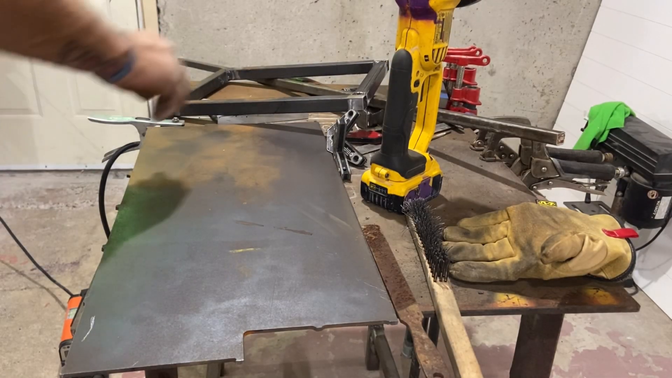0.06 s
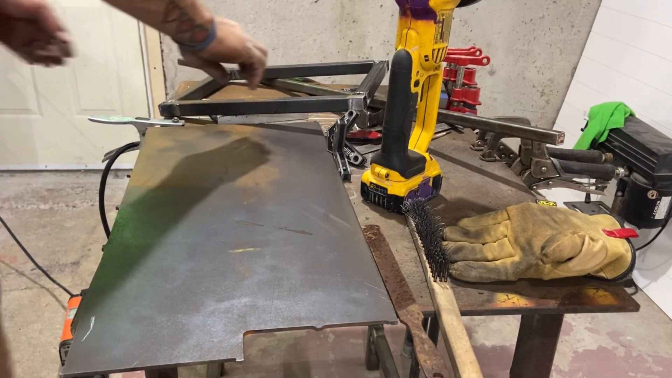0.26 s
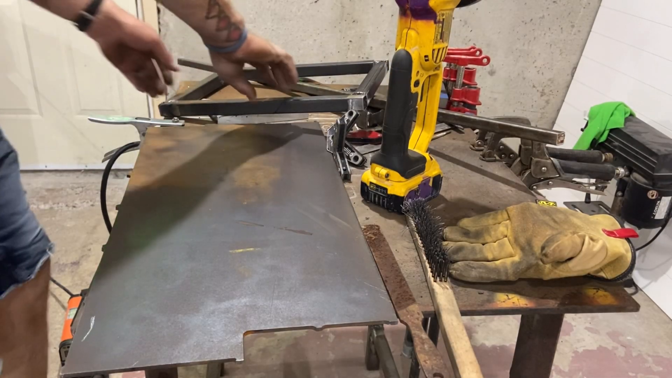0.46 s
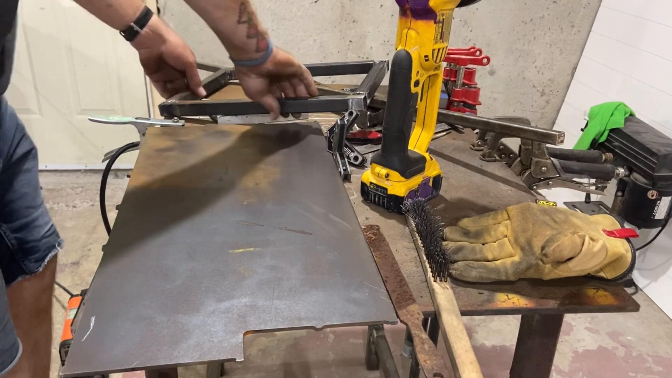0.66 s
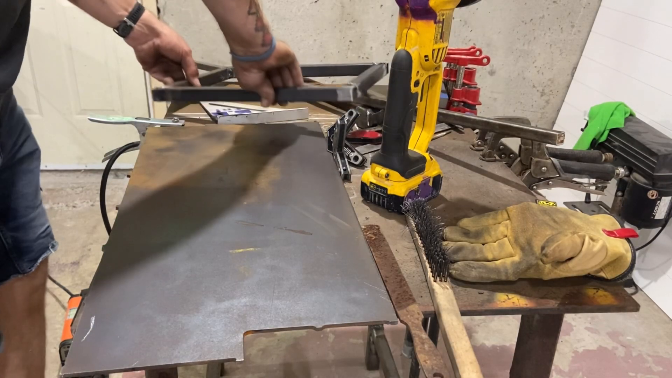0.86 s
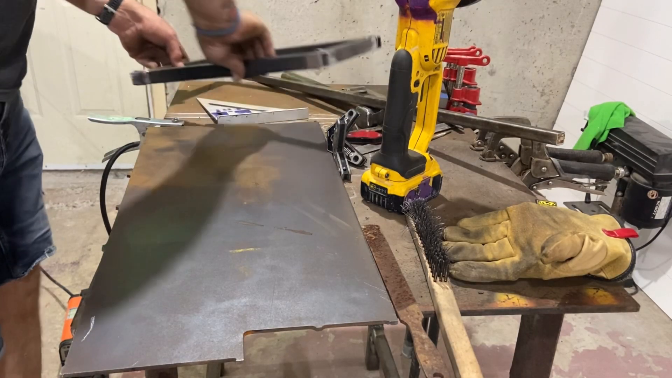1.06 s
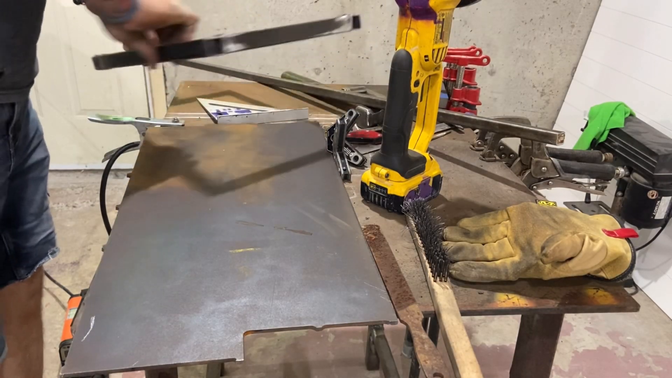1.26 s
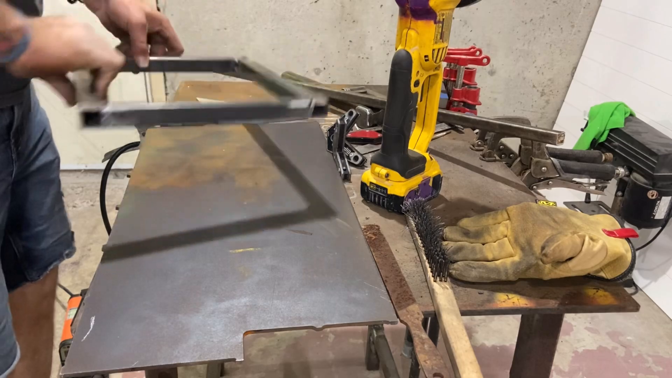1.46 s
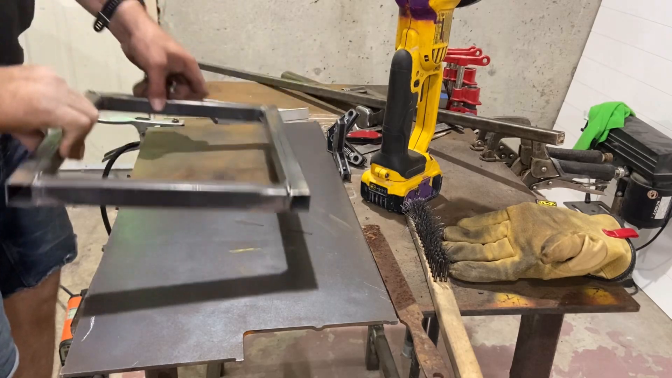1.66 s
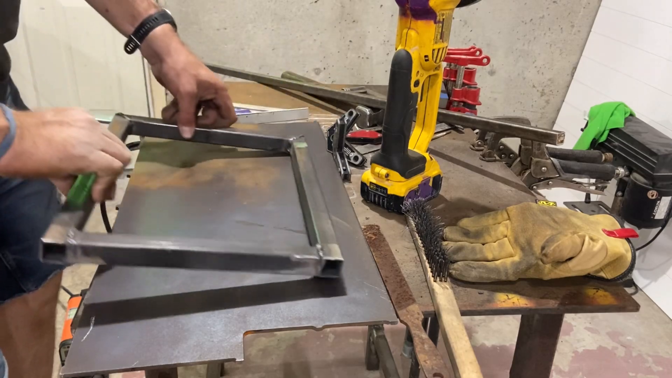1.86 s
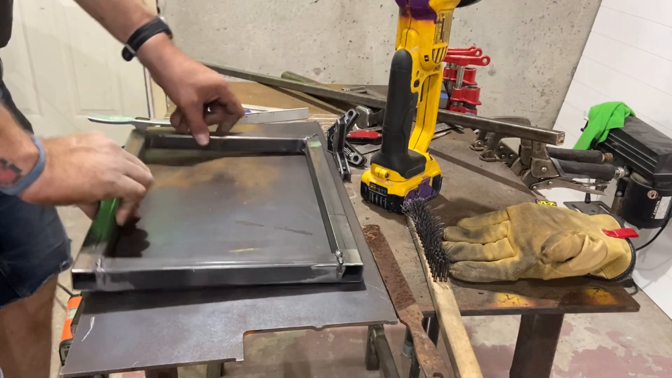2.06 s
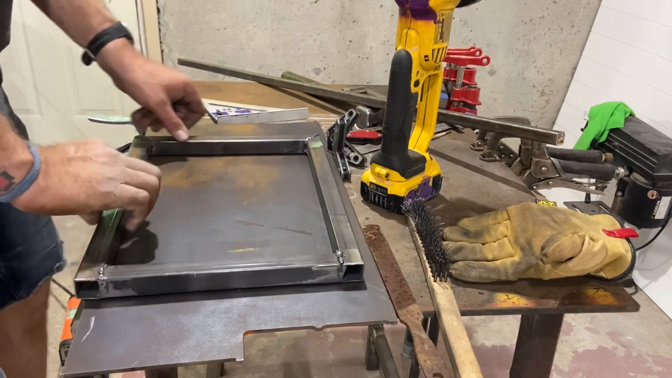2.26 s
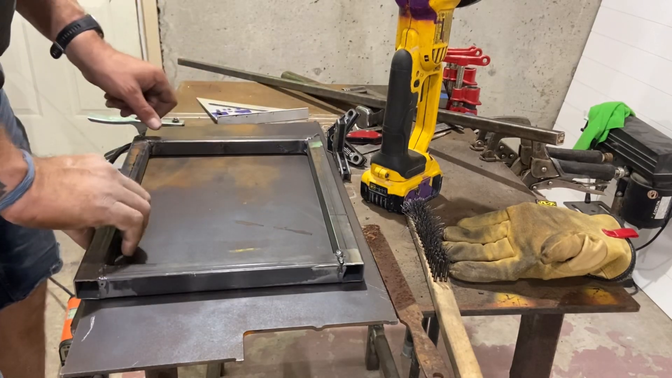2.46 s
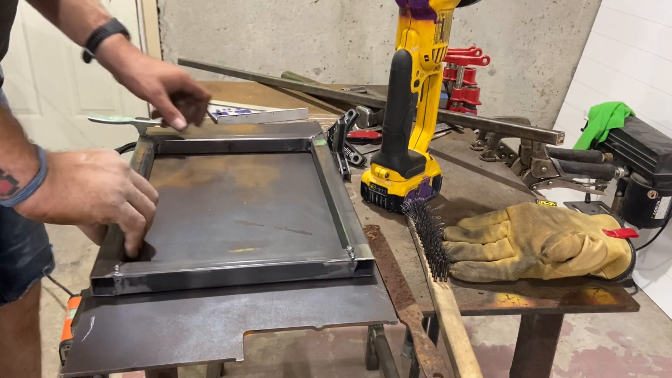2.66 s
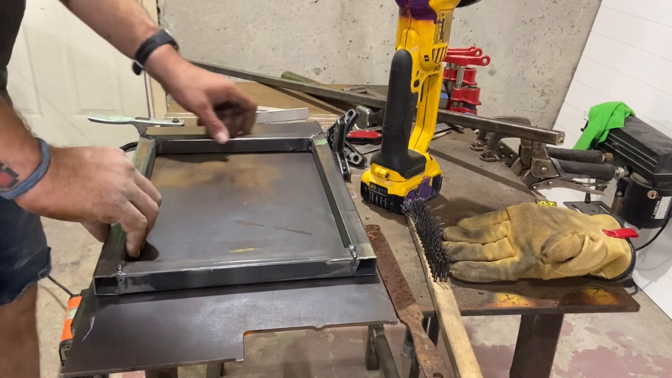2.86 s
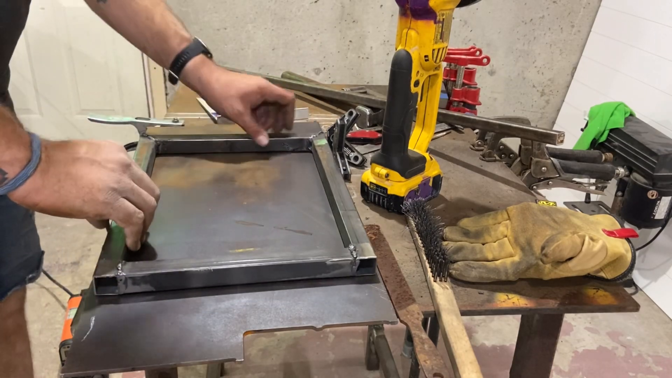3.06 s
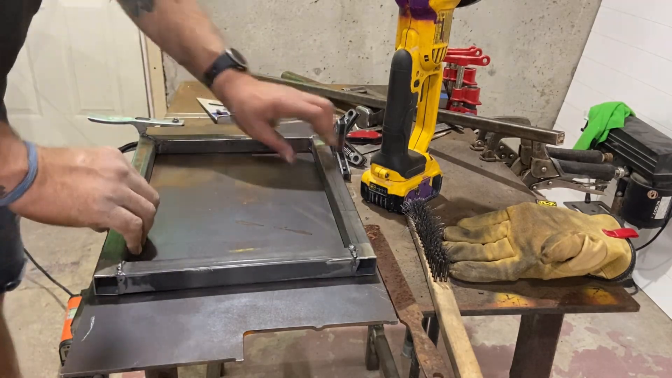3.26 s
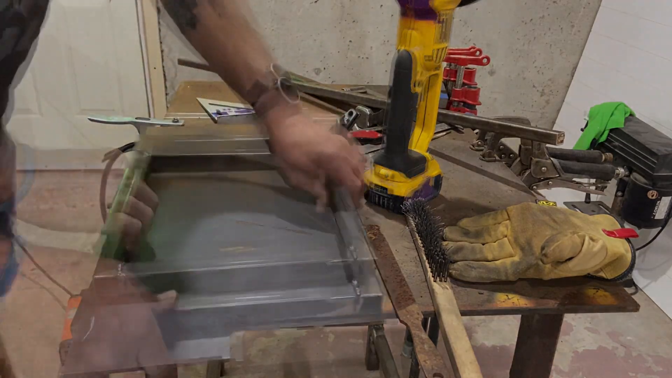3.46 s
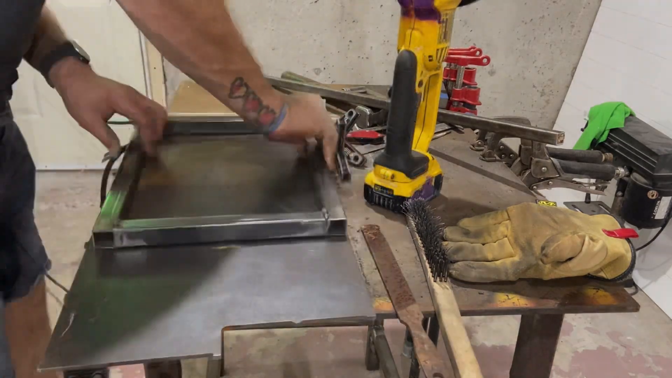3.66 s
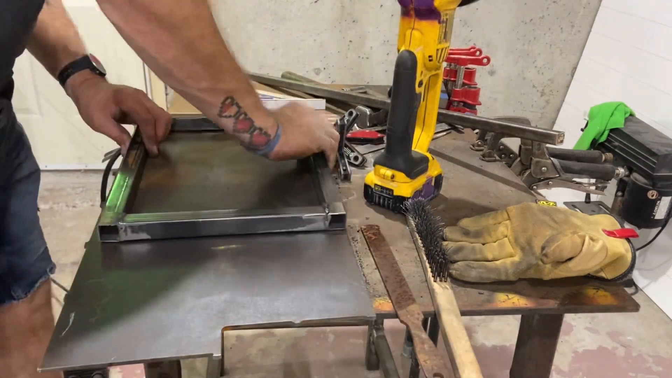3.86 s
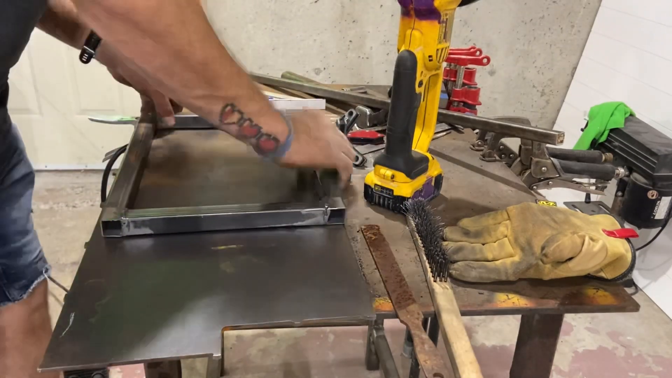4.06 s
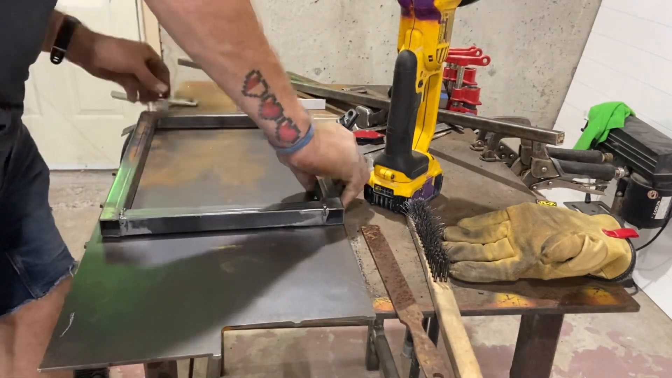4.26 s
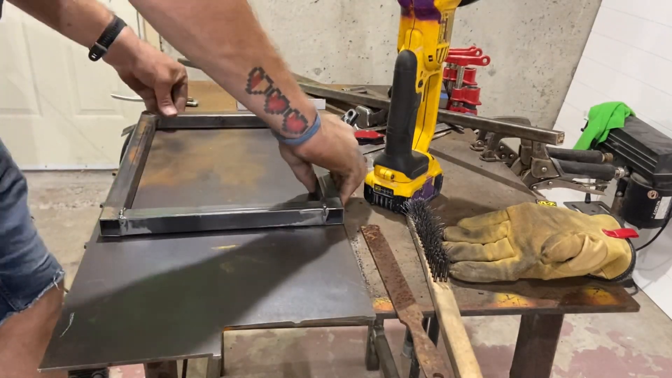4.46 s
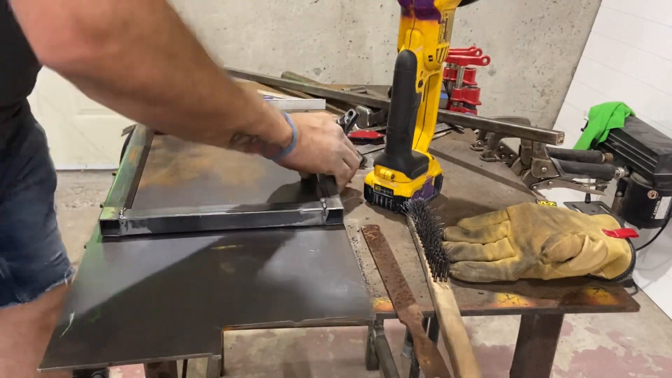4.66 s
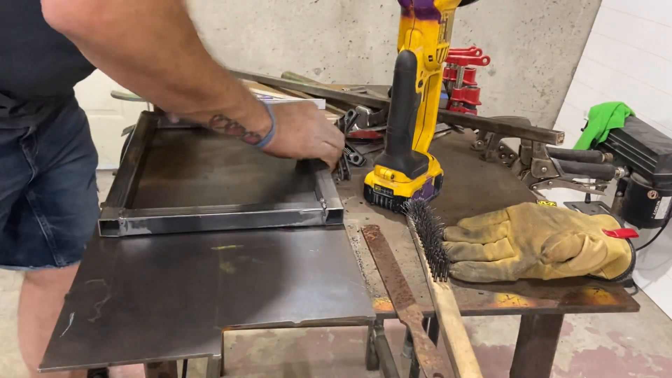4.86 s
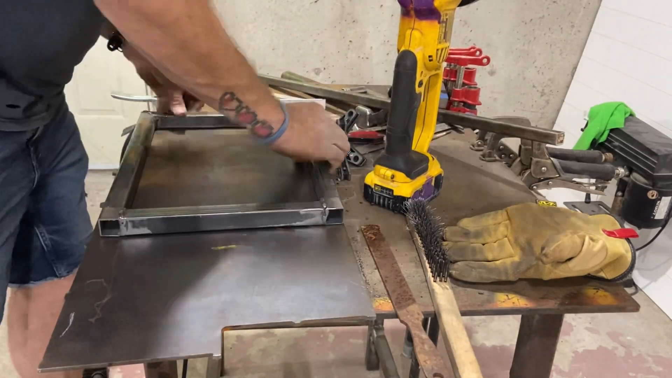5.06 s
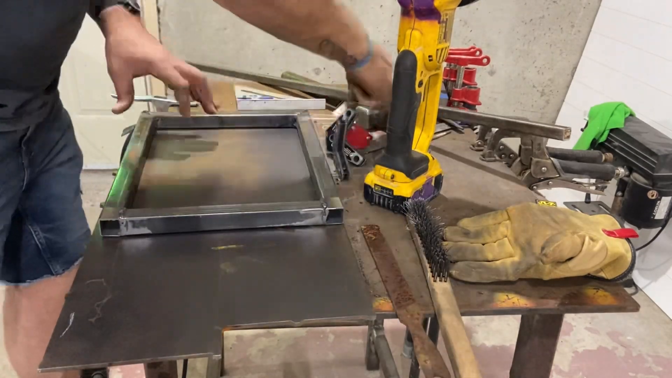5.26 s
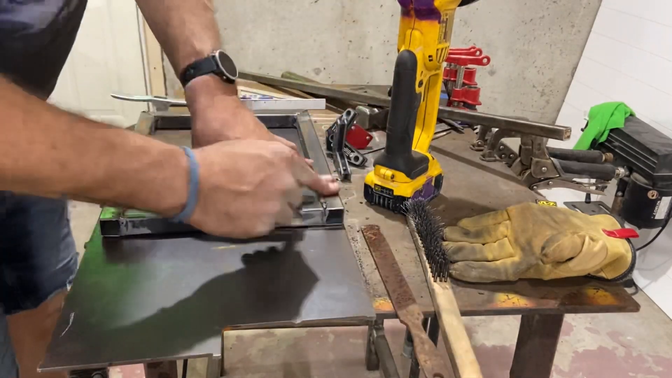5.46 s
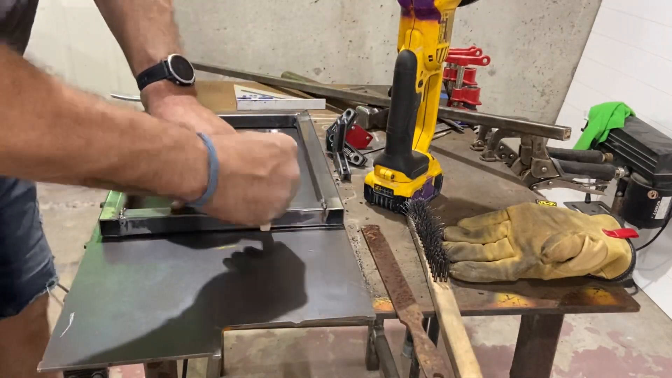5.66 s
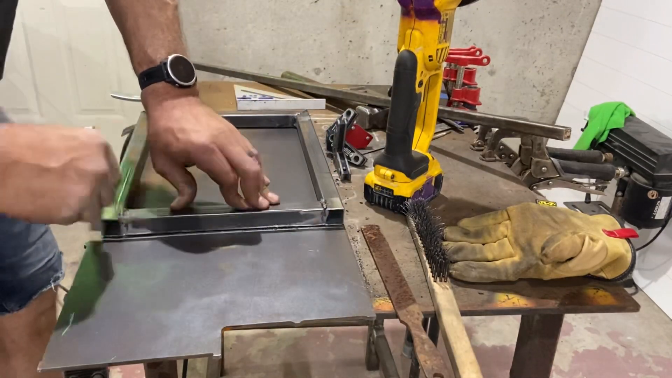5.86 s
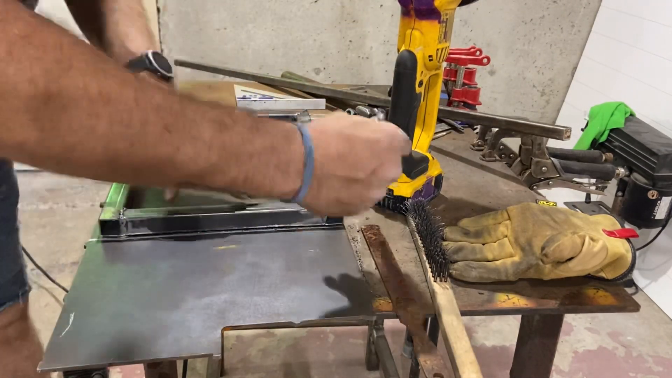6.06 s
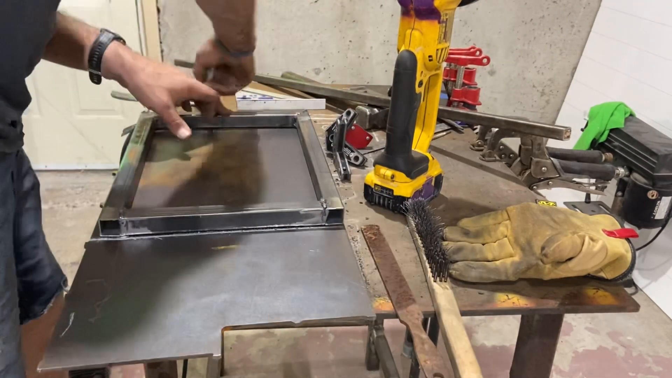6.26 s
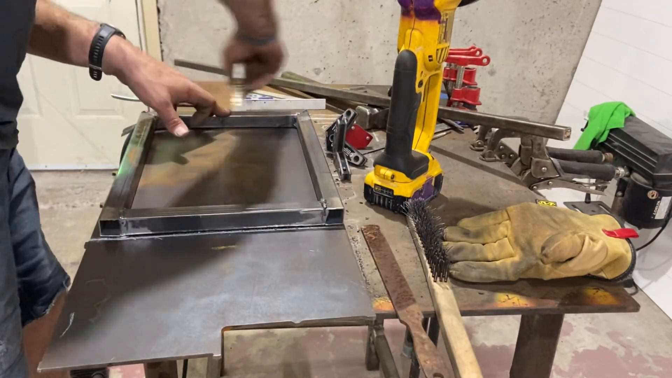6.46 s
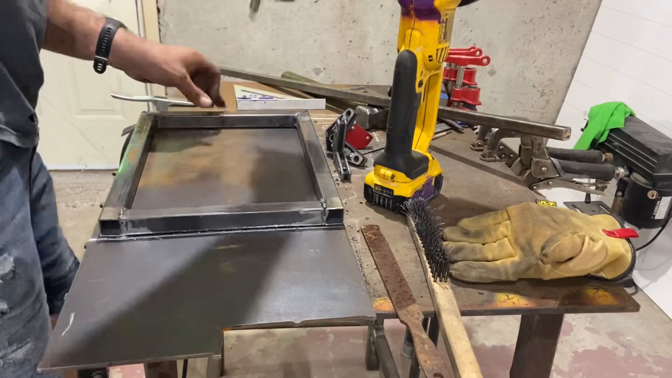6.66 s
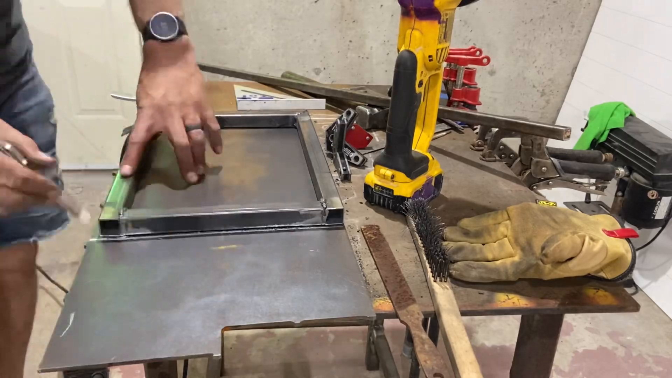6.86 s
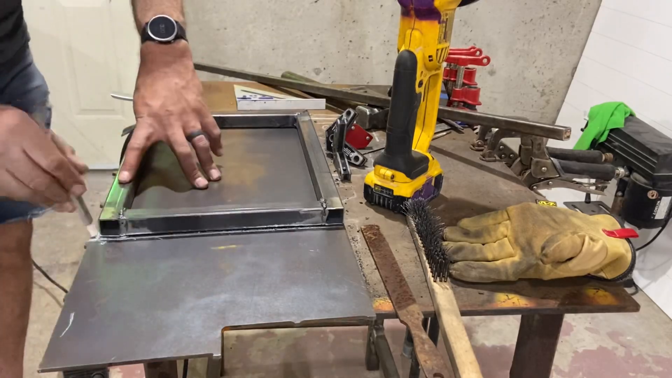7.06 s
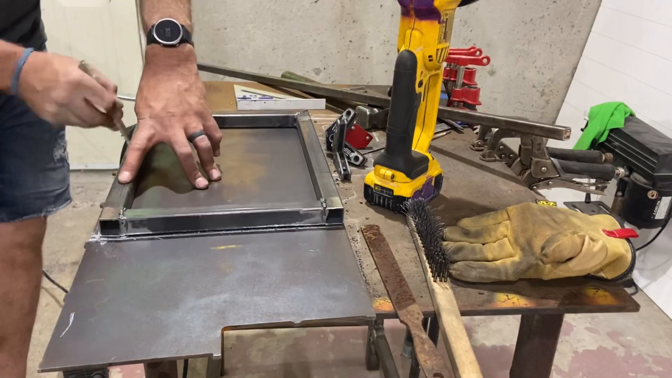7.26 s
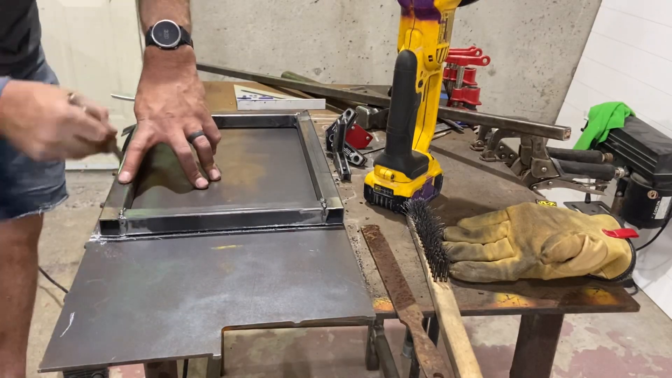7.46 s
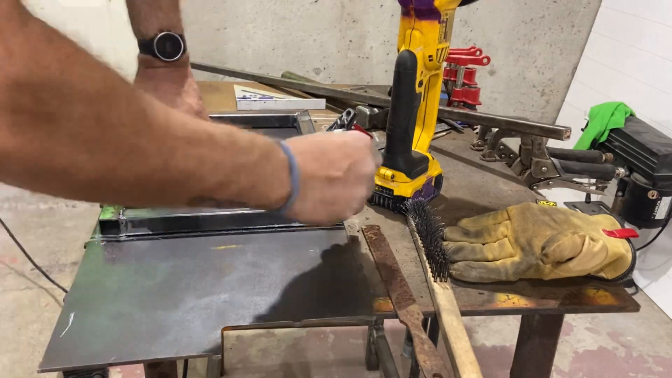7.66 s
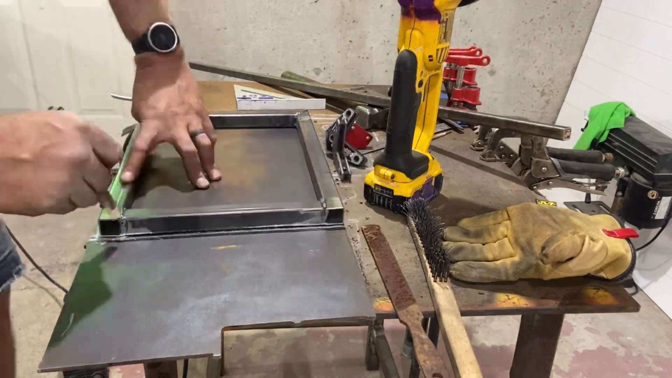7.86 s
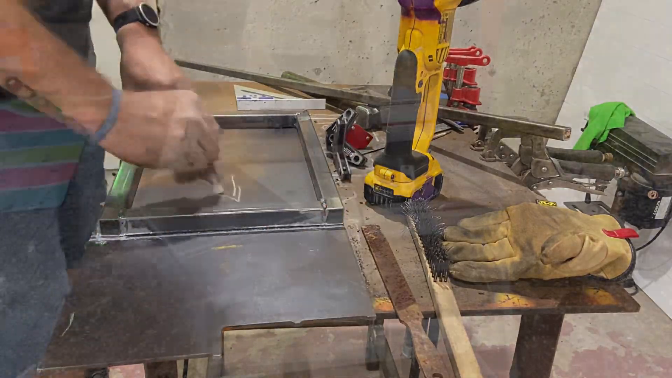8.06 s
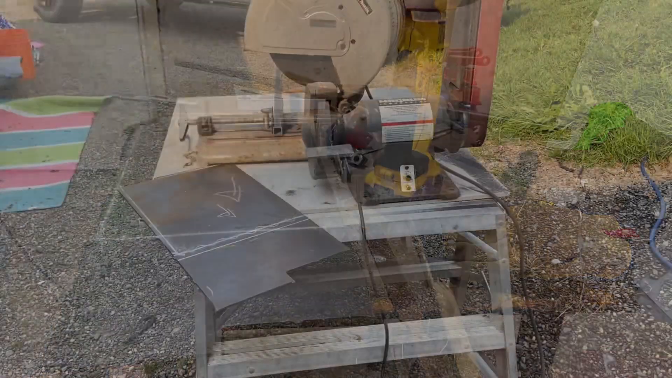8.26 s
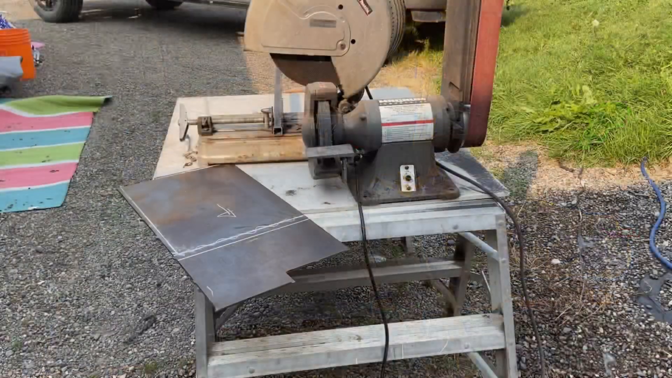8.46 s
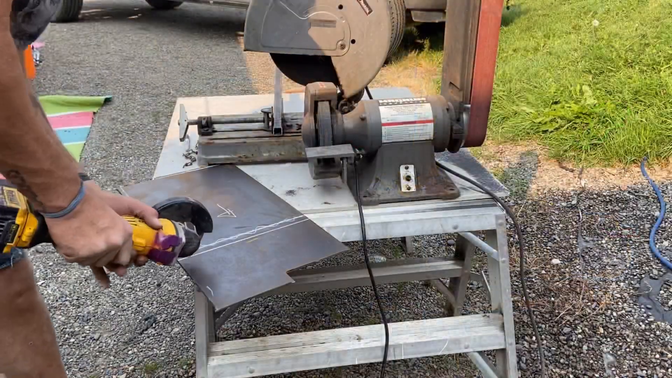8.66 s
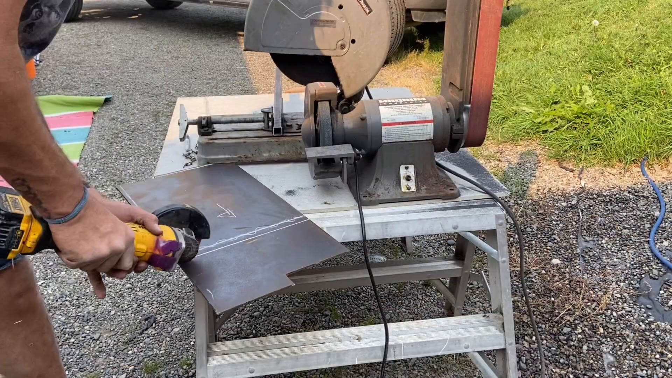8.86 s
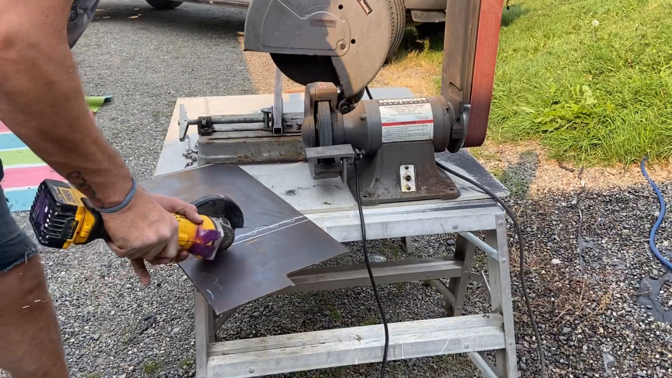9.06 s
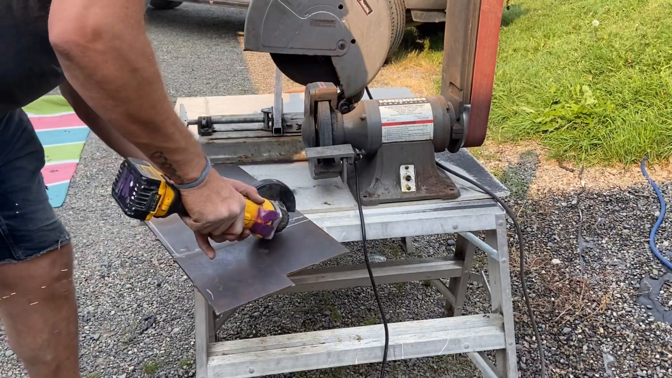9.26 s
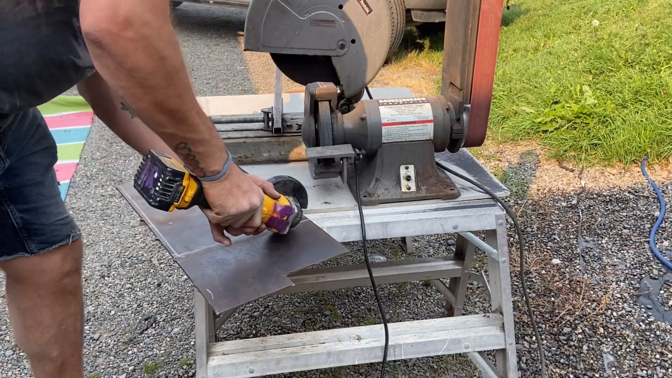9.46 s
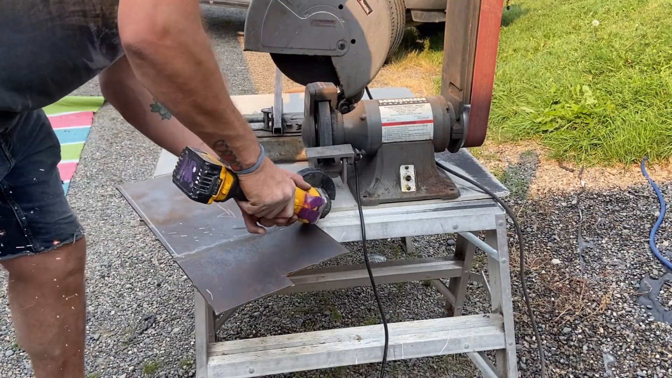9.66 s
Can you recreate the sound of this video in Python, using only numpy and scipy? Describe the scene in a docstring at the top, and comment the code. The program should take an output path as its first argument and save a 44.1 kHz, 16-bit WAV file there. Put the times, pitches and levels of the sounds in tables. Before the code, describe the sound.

In a home workshop with a soft fan hum, a welded steel frame scrapes, clinks against loose bars and lands on sheet steel in two loud ringing blows, then slides. Time speeds up: the hum turns to thin hissing whine with quick chirping marker strokes. Finally, outdoors, a sped-up angle grinder clicks on and cuts in three shrill pushes. Close microphone, lively room, then dry open air.

```python
"""In a workshop where a fan hums, a welded steel frame slides, clinks on loose bars and lands in two blows:
excited modes ring and die. Then time runs about ten times fast: the hum becomes whining lines in a thin
hiss, and friction noise in short swells makes chirps of marker strokes. Still sped up, an angle grinder
clicks and spins up outdoors and cuts the sheet in three pushes, as tones locked to its disc, noise that
pulses with each turn, and screeching resonances."""
import sys
import numpy as np
from scipy import signal
from scipy.fft import rfft, irfft
from scipy.io import wavfile

SR = 44100
rng = np.random.default_rng(int(sys.argv[2]) if len(sys.argv) > 2 else 0)


def log_audio(samples):
    """Write samples as a 16-bit WAV file to the path given in sys.argv[1]."""
    # one column per channel
    frames = np.atleast_2d(samples).T
    # limit to full scale, then quantise
    limited = np.clip(frames, -1, 1)
    pcm = np.round(limited * 32767).astype(np.int16)
    wavfile.write(sys.argv[1], SR, pcm)


N = 427769
T = np.arange(N) / SR
HZ = np.fft.rfftfreq(N, 1 / SR)
SPEED_UP_S, SLOW_END_S, INDOOR_END_S = 3.267, 3.774, 8.528  # the two fan sounds overlap at first


def amp(db):
    """Level law: decibels to amplitude gain."""
    return 10 ** (np.asarray(db) / 20)


def unit(x):
    """Normalisation to rms 1."""
    return x / np.sqrt(np.mean(x ** 2) + 1e-20)


def read(points, hz):
    """Interpolation of a spectrum along a logarithmic frequency axis."""
    f, value = np.transpose(points)
    return np.interp(np.log(hz + 1), np.log(f + 1), value)


def curve(rows):
    """Linear interpolation of a (time, value) table at every sample."""
    rows = np.array(rows)
    return np.interp(T, rows[:, 0], rows[:, 1])


def gate(start, end, fade=0.0034):
    """Trapezoidal window: one between two times, with short ramps inside."""
    return np.clip((T - start) / fade, 0, 1) * np.clip((end - T) / fade, 0, 1)


def swell(start, length, attack, release):
    """Envelope: linear rise from the start, hold until start + length, exponential decay."""
    rise = np.clip((T - start) / attack, 0, 1)
    return rise * np.exp(-np.maximum(T - start - length, 0) / release)


def add(mix, s, sound):
    """Superposition: mixes a sound in at a time."""
    part = mix[round(s * SR):][:len(sound)]
    part += sound[:len(part)]


def colour(x, db):
    """Linear filtering by a gain in dB at every frequency; rms 1."""
    return unit(irfft(rfft(x) * amp(db), N))


def noise(db):
    """Filtered Gaussian noise of rms 1."""
    return colour(rng.standard_normal(N), db)


def wander(hz):
    """Low-pass random modulation up to a rate; rms 1."""
    return unit(irfft(rfft(rng.standard_normal(N)) * np.exp(-(HZ / hz) ** 2), N))


def grit(per_s, spread_db):
    """Poisson-like friction: tiny contacts of uneven size at random times."""
    size = amp(spread_db * np.minimum(rng.exponential(1, N), 4))
    return size * rng.standard_normal(N) * (rng.random(N) < per_s / SR)


def bell(hz, width):
    """Lorentzian power response of one damped resonance."""
    return 1 / (1 + (2 * (HZ - hz) / width) ** 2)


def ripple(spacing_hz):
    """Modal crowding in a steel sheet, as a random ripple over frequency; rms 1."""
    knots = np.arange(0, SR / 2, spacing_hz)
    return unit(np.interp(HZ, knots, rng.standard_normal(SR)[:len(knots)]))


def flaring(drive, modes, flare_db, rate_hz):
    """Moving-contact excitation: high resonances of the steel flare up and fade separately; rms 1."""
    total = 0
    for hz, width, db in modes:
        flare = amp(db + flare_db * wander(rate_hz))
        total = total + flare * colour(drive, 20 * np.log10(bell(hz, width)))
    return unit(total)


def mode_ring(hz, t60, t):
    """Beating: a square tube rings in two close modes that start together and decay exponentially."""
    phase, split = rng.random(), 1 + 0.0024 * rng.uniform(0.5, 1)
    pair = np.sin(2 * np.pi * (hz * t + phase)) + .3 * np.sin(2 * np.pi * (hz * split * t + phase))
    return pair * np.exp(-np.log(1000) * t / t60)


def dying(spectrum, t60):
    """Frequency-dependent decay: one second of dense ringing from about rms 1, each band at its own speed."""
    hz, t, z = signal.stft(rng.standard_normal(SR), SR, nperseg=256)
    z = z * amp(read(spectrum, hz))[:, None]
    start = np.std(signal.istft(z, SR, nperseg=256)[1])
    decay = np.exp(-np.log(1000) * t / read(t60, hz)[:, None])
    return signal.istft(z * decay, SR, nperseg=256)[1][:SR] / start


def hum(lines, drift_hz, rate_hz, flutter):
    """Tonal machine noise: lines share one proportional drift (drift_hz at the last) and waver in level."""
    drift = np.cumsum(wander(rate_hz)) * drift_hz / lines[-1][0]
    waver = [1 + flutter * wander(rate_hz) for _ in range(3)]
    total = 0
    for k, (hz, db) in enumerate(lines):
        cycles = hz * (T + drift / SR) + rng.random()
        total = total + amp(db) * waver[k % len(waver)] * np.sin(2 * np.pi * cycles)
    return np.sqrt(2) * total


# spectrum of the fan's rushing air: (frequency [Hz], relative density [dB per Hz])
FAN_AIR_SPECTRUM = [(21, -55), (35, -15.5), (102, 0.5), (177, -3.5), (217, -9), (295, -4.5), (453, -9.5),
                    (663, -10.5), (922, -12.5), (1530, -17), (1920, -21), (2300, -20.5), (2610, -23),
                    (2810, -22.5), (15000, -43)]
# hum of the fan's motor: (frequency [Hz], level [dB])
FAN_HUM_LINES = [(166.9, -52.5), (290.7, -50), (360.7, -51), (516.8, -55), (656.8, -50.5)]
# brief dip of the fan sound after the second blow: (time [s], gain [dB])
FAN_DIP = [(2.12, 0), (2.16, -9), (2.2, -16), (2.28, -14), (2.36, -5), (2.46, 0)]


def fan():
    """Broadband flow noise and tonal motor hum at natural speed."""
    air = amp(-38) * noise(read(FAN_AIR_SPECTRUM, HZ))
    motor = hum(FAN_HUM_LINES, drift_hz=0.34, rate_hz=5.2, flutter=0.49)
    return (air + motor) * amp(curve(FAN_DIP)) * gate(-1, SLOW_END_S)


# shoves of the frame over steel: (start [s], rise and hold [s], grinding body [dB], gritty top [dB])
SHOVES = [(0.273, .035, -45.5, -46), (0.831, 0.068, -48, -44.5), (1.16, .04, -55, -47),
          (1.937, .04, -35, -44), (2.006, 0.027, -37, -35.5), (2.073, 0.024, -37, -31),
          (2.555, 0.13, -32, -43.5), (3.456, 0.316, -42.5, -48)]
# spectrum of the grinding body: (frequency [Hz], relative density [dB per Hz])
GRINDING_SPECTRUM = [(530, -28), (900, -13), (1400, -2.5), (1560, -8), (2200, -6.5), (3240, -19.5),
                     (4290, -25), (5300, -21), (9000, -33.5), (11700, -54), (19800, -120)]
# spectrum of the gritty top, also of the clinks' scratch: (frequency [Hz], relative density [dB per Hz])
GRITTY_SPECTRUM = [(2500, -7), (5000, -2.5), (7000, -2.5), (9000, -5), (12000, -8.5), (15500, -13)]


def slides():
    """Stick-slip friction: small catches of steel on steel excite the frame's modes; each shove judders."""
    ring_db = 10 * np.log10(0.079 + sum(bell(mode[0], 32) for mode in FRAME_MODES))
    catches = grit(per_s=12000, spread_db=-0.3) * amp(1.6 * wander(50))
    body = colour(catches, read(GRINDING_SPECTRUM, HZ) + ring_db)
    top = colour(catches, read(GRITTY_SPECTRUM, HZ) + ring_db)
    out = np.zeros(N)
    for s, length, body_db, top_db in SHOVES:
        shove = swell(s, length, attack=0.023, release=0.034)
        out += shove * (amp(body_db) * body + amp(top_db) * top)
    return out


# touches as the frame is lifted off loose bars: (time [s], ring gain [dB])
BAR_TOUCHES = [(.302, -61), (.812, -45), (.845, -40), (.866, -44), (1.133, -55), (1.176, -57), (1.2, -47.5)]
# modes of a loose bar: (frequency [Hz], t60 [s], relative amplitude [dB])
BAR_MODES = [(2080, 0.18, 0), (3200, 0.17, -10), (5000, 0.27, -7), (5530, 0.4, -4.5), (7140, 0.25, 1),
             (7400, .15, -5), (11500, 0.16, -4), (14500, .1, -11)]


def clinks():
    """Modal excitation: light touches scratch a loose steel bar and ring it."""
    out, t = np.zeros(N), np.arange(SR // 2) / SR
    scratch = noise(read(GRITTY_SPECTRUM, HZ) + 4.7 * ripple(250))
    for s, db in BAR_TOUCHES:
        ring = sum(amp(mode_db) * mode_ring(hz, t60, t) for hz, t60, mode_db in BAR_MODES)
        add(out, s, amp(db) * ring * (1 - np.exp(-t / .0005)))
        out += amp(db + 6.5) * swell(s, 0, attack=.001, release=0.013) * scratch
    return out


# blows: (time [s], ring gain [dB], sheet gain [dB], crack gain [dB], contact [0 edge, 1 corner])
LANDINGS = [(1.8666, -16.5, -14, -11, 0), (2.111, -14.5, -12.5, -12, 1)]
# modes of the frame on the sheet, which also colour the slides:
# (frequency [Hz], t60 [s], relative amplitude struck on edge [dB], same struck on corner [dB])
FRAME_MODES = [(619, 0.42, -6, -28), (778, 0.29, -1, -14), (1046, 0.32, -6, -14), (1261, 0.33, -10, -7),
               (1421, 0.36, -5, -8), (1620, 0.35, -5, -4), (1789, 0.32, -3, -8), (2085, 0.32, -4, -2),
               (2272, 0.36, 0, -13), (2420, 0.35, -4, -10), (2667, 0.31, -5, -16), (2906, 0.28, -4, -10),
               (3215, 0.31, -11, -7), (3476, 0.25, -17, -2), (3604, 0.28, -10, -9), (4094, 0.3, 1, -6),
               (4459, 0.28, -16, -5), (4802, 1.15, -24, -14), (5099, 0.31, -37, -10), (5323, 0.28, -22, -9),
               (5939, 0.33, -30, -8), (6160, 0.28, -26, -3), (6751, 0.26, -27, -5), (7337, 0.38, -21, -13),
               (7603, 0.42, -29, -10), (8433, 0.35, -39, -10), (8780, 0.35, -39, -9),
               (10072, 0.49, -36, -17), (10872, 0.4, -41, -20), (11907, 0.37, -43, -18)]
# dense ringing of the sheet under an edge: (frequency [Hz], relative density [dB per Hz])
EDGE_SPECTRUM = [(88, -45), (150, -23), (464, -14), (786, -3.5), (901, -20), (1030, -13), (1160, -7),
                 (1380, -8), (2340, -1), (4630, -7.5), (6080, -19.5), (9340, -23), (15800, -52)]
# dense ringing of the sheet under a corner: (frequency [Hz], relative density [dB per Hz])
CORNER_SPECTRUM = [(88, -51), (150, -18), (492, -12), (564, -14), (833, -16), (1380, -5.5), (1710, -3.5),
                   (2120, -1.5), (3520, -6), (3810, -5.5), (6840, -7.5), (12000, -26.5), (15800, -40)]
# decay of the sheet: (frequency [Hz], t60 [s])
SHEET_DECAY = [(200, 0.16), (1000, 0.53), (2500, 0.23), (6000, 0.19), (14000, 0.47)]
# decay of the room: (frequency [Hz], t60 [s])
ROOM_DECAY = [(200, 0.43), (1500, 1), (5000, 0.98), (14000, 1)]


def blows():
    """Impact response: edge, then corner, excites a crack, the frame's modes, the sheet and the room."""
    out, t = np.zeros(N), np.arange(SR) / SR
    for s, ring_db, sheet_db, crack_db, contact in LANDINGS:
        corner = int(contact > .5)
        spectrum = [EDGE_SPECTRUM, CORNER_SPECTRUM][corner]
        sizes = amp([mode[2 + corner] for mode in FRAME_MODES])
        ring = sum(size * mode_ring(mode[0], mode[1], t) for size, mode in zip(sizes, FRAME_MODES))
        ring = ring / np.linalg.norm(sizes)
        ring *= 1 + np.exp(-t / 0.016)  # the contact soaks up the first swing quickly
        sheet = dying(spectrum, SHEET_DECAY)
        crack = dying(spectrum, SHEET_DECAY) * np.exp(-t / 0.033)
        # the room builds up and rides on the sheet's level
        room = amp(-15.5) * dying(spectrum, ROOM_DECAY) * (1 - np.exp(-t / 0.0093))
        blow = amp(ring_db) * ring + amp(sheet_db) * (sheet + room) + amp(crack_db) * crack
        add(out, s, blow * (1 - np.exp(-t / .0004)))
    return out


# squeals under the frame or the disc: (start [s], rise and hold [s], frequency [Hz], level [dB])
SQUEAL_NOTES = [(2.617, 0.08, 1380, -34.5), (8.76, 0.16, 2180, -45.5), (8.81, 0.099, 7700, -41),
                (8.86, 0.11, 13250, -28), (9.1, 0.051, 11040, -33), (9.11, 0.07, 13070, -22.5)]


def squeals():
    """Friction-driven resonance: the sheet catches and one narrow band of noise takes over."""
    out = np.zeros(N)
    for s, length, hz, db in SQUEAL_NOTES:
        note = noise(20 * np.log10(bell(hz, width=100)))
        out += amp(db) * swell(s, length, attack=0.02, release=.025) * note
    return out


# spectrum of the sped-up air: (frequency [Hz], relative density [dB per Hz])
FAST_AIR_SPECTRUM = [(59, -82), (100, -48.5), (307, -45), (469, -26.5), (522, -14.5), (605, -5.5),
                     (1010, -4), (1500, -5.5), (1900, -5), (2070, -11.5), (2840, -9), (3820, -10),
                     (6630, -13), (7220, -13.5), (15800, -14)]
# resonances in the sped-up air: (frequency [Hz], width [Hz], height [dB])
FAST_AIR_PEAKS = [(634, 93, 5), (1010, 113, 8), (1370, 56, 6), (1888, 38, 7.5), (3565, 123, 12.5),
                  (5260, 250, 9.5), (5770, 100, -3), (5770, 72, 5), (6610, 230, 13), (7820, 180, 6),
                  (8580, 250, 6.5), (9200, 460, -1), (10600, 370, 5), (11900, 200, 2.5), (13400, 2000, -4)]
# whine of the sped-up motor: (frequency [Hz], level [dB])
FAST_WHINE_LINES = [(484.5, -62), (1028, -58), (1200, -52), (1685, -53), (1868, -58), (1938, -57),
                    (2169, -57), (2422, -63), (2654, -59), (2885, -52), (2907, -50), (3138, -51),
                    (3370, -59), (3601, -58), (3854, -62), (4107, -65), (4360, -66)]


def fast_fan():
    """Frequency scaling by speed: thin hiss and whining lines, two of which beat; the lower whine lingers."""
    peaks_db = sum(db * bell(hz, width) for hz, width, db in FAST_AIR_PEAKS)
    air = amp(-38) * noise(read(FAST_AIR_SPECTRUM, HZ) + peaks_db)
    whine = hum(FAST_WHINE_LINES, drift_hz=1.12, rate_hz=5.0, flutter=0.13)
    lingering = amp(-57.5) * colour(whine, 10 * np.log10(bell(940, 900)))
    return (air + whine) * gate(SPEED_UP_S, INDOOR_END_S) + lingering * gate(INDOOR_END_S, 8.77)


# even runs of the marker to and fro:
# (first stroke [s], last stroke [s], strokes [count], first gain [dB], last gain [dB])
SCRIBBLE_RUNS = [(5.66, 5.749, 5, -43, -36), (5.775, 5.882, 5, -36, -38), (5.939, 6.04, 3, -34, -37),
                 (6.176, 6.219, 2, -40, -36.5), (6.282, 6.335, 4, -42, -43), (6.362, 6.546, 12, -35, -30),
                 (6.615, 6.642, 2, -38, -29), (6.982, 7.055, 5, -36.5, -34), (7.116, 7.174, 4, -31, -27),
                 (7.199, 7.247, 3, -27.5, -28), (7.433, 7.504, 4, -30, -31), (7.712, 7.81, 5, -39, -40)]


def scribbles():
    """Periodic excitation: evenly spaced strokes rise or fall in pressure; rows as in SINGLE_TOUCHES."""
    rows = []
    for first, last, count, first_db, last_db in SCRIBBLE_RUNS:
        for along in np.linspace(0, 1, round(count)):
            db = first_db + along * (last_db - first_db) + 1.4 * rng.standard_normal()
            rows.append((first + along * (last - first), db, .0072, -18.5))
    return rows


# single taps and flicks:
# (middle [s], gain [dB], half-power length [s], body relative to top before a common boost [dB])
SINGLE_TOUCHES = [(3.277, -34.5, 0.011, -7.5), (3.346, -35.5, .007, -5), (3.492, -30, 0.013, -6.5),
                  (3.631, -31, 0.029, -7), (3.658, -24.5, 0.014, -8), (3.692, -35, 0.028, -4),
                  (3.758, -43, .012, 1), (3.847, -39, .0055, -8), (4.128, -41, .012, -5),
                  (4.252, -39.5, .0065, 3.5), (4.31, -38, .006, -9), (5.255, -37, .005, -7),
                  (5.281, -30.5, 0.0055, -4), (6.576, -23.5, 0.012, -10.5), (7.288, -27, 0.01, -28),
                  (7.371, -31, .008, -22), (7.555, -35, 0.0092, -16), (7.662, -37.5, 0.022, -8),
                  (7.996, -40, .0045, -8), (8.045, -42, 0.0051, 0), (8.076, -40, .012, -17),
                  (8.209, -32.5, .012, -7), (8.562, -41, 0.006, -4), (8.621, -47, 0.023, 0)]
# spectrum of the stroke's hissing top: (frequency [Hz], relative density [dB per Hz])
STROKE_TOP_SPECTRUM = [(1000, -70), (6000, -35), (8000, -6), (10000, -4), (11800, 3), (15700, -3.5)]
# spectrum of the stroke's body: (frequency [Hz], relative density [dB per Hz])
STROKE_BODY_SPECTRUM = [(300, -38), (800, -26), (2200, -7), (4000, -4), (5500, -6), (6450, -0.5),
                        (8000, -7), (10000, -12.5)]
# squeaks that flare up in the strokes: (frequency [Hz], width [Hz], relative gain [dB])
SQUEAK_MODES = [(10050, 520, -12), (11330, 350, -4), (12260, 400, -9.5), (13300, 400, -11), (14050, 200, 2),
                (14900, 400, -2)]


def strokes():
    """Friction noise under a power envelope: each stroke bites fast and lets go more slowly."""
    top, body = np.zeros(N), np.zeros(N)  # powers
    t = np.arange(-SR // 10, SR // 10) / SR
    for s, db, length, body_db in SINGLE_TOUCHES + scribbles():
        bite = np.exp(-np.log(2) * abs(2 * t / length) ** 3)
        release = np.exp(-np.log(2) * (2 * t / length) ** 2)
        tail = amp(-20.5) * np.exp(-abs(t) / 0.017)
        power = np.where(t < 0, bite, release + tail)
        add(top, s + t[0], amp(db) ** 2 * power)
        add(body, s + t[0], amp(db + body_db) ** 2 * power)
    scratch = grit(per_s=16000, spread_db=3.0)
    hiss = amp(-4.5) * colour(scratch, read(STROKE_TOP_SPECTRUM, HZ))
    squeak = amp(-3.5) * flaring(scratch, SQUEAK_MODES, flare_db=3.0, rate_hz=82)
    scrape = amp(4.5) * colour(scratch, read(STROKE_BODY_SPECTRUM, HZ) + 2.3 * ripple(110.8))
    return np.sqrt(top) * (hiss + squeak) + np.sqrt(body) * scrape


# spectrum of the air of the yard: (frequency [Hz], relative density [dB per Hz])
YARD_SPECTRUM = [(88, -83), (150, -43), (278, -56), (477, -18), (1050, -0.5), (1180, -2), (1800, -7),
                 (2650, -9), (5200, -8), (11500, -19), (15000, -9)]


def outdoors():
    """Stationary ambient noise: the faint air of the yard."""
    return amp(-52.5) * noise(read(YARD_SPECTRUM, HZ)) * gate(INDOOR_END_S, 11)


# clicks of the trigger and gears as the grinder starts: (time [s], level [dB])
START_CLICKS = [(8.672, -38), (8.692, -33), (8.697, -30), (8.7, -19), (8.703, -24)]
# spectrum of a click: (frequency [Hz], relative density [dB per Hz])
CLICK_SPECTRUM = [(300, -50), (1500, -31), (5000, -20), (6300, -3), (7300, -5), (8500, -8), (11000, -1),
                  (15700, -14)]


def clicks():
    """Transient noise: dry snaps of the switch and gears, decaying exponentially."""
    level = sum(amp(db) * (T >= s) * np.exp(-abs(T - s) / 0.0014) for s, db in START_CLICKS)
    return level * noise(read(CLICK_SPECTRUM, HZ))


def orders(turns, table, rate_hz, flicker_db, loose=1):
    """Order tones: sines at multiples of the disc rate, each with its own random pitch and level motion."""
    total = 0
    for multiple, db, blur_hz in table:
        level = amp(db + flicker_db * wander(23))
        blur = np.cumsum(loose * wander(rate_hz)) * blur_hz / SR
        total = total + level * np.sin(2 * np.pi * (multiple * turns + blur))
    return np.sqrt(2) * total


# pushes of the disc into the sheet: (start [s], end [s], full bite [dB], time to sink in [s],
# full screech [dB], full knocking before skitter and flicker [dB])
CUT_PUSHES = [(8.757, 9.075, -30, 0.057, -27.5, -38.5), (9.08, 9.368, -30.5, 0.081, -27.5, -34.5),
              (9.405, 9.72, -29.5, 0.1, -27.5, -34)]


def pushes():
    """Depth-dependent excitation: gains of bite, screech and knocking as the disc grazes, then sinks in."""
    bite, screech, knocking = np.zeros((3, N))
    for start, end, bite_db, sink_s, screech_db, knock_db in CUT_PUSHES:
        contact = swell(start, end - start, attack=.005, release=0.0099)
        depth_db = -9.5 * np.exp(-((T - start) / sink_s) ** 2)
        bite += contact * amp(bite_db + depth_db)
        # screech and knocking change by these dB per dB of bite
        screech += contact * amp(screech_db + 0.93 * depth_db)
        knocking += contact * amp(knock_db + 1.73 * depth_db)
    return bite, screech, knocking


# the grinder spins up, sags in the cut, recovers when lifted, sags again: (time [s], disc rate [turns/s])
DISC_SPEED = [(8.698, 700), (8.715, 990), (8.73, 1070), (8.76, 1112), (8.9, 1045), (9.056, 945), (9.2, 908),
              (9.372, 878), (9.385, 1050), (9.41, 1095), (9.485, 1050), (9.515, 900), (9.7, 850)]
# tones of the motor: (multiple of disc rate, relative level [dB], rms pitch wander [Hz])
MOTOR_TONES = [(3.48, -19.5, 14), (9.25, -1.5, 132), (12, -1, 20.5)]
# tones of the disc: (multiple of disc rate, relative level [dB], rms pitch wander before skitter [Hz])
DISC_TONES = [(1, -18, 12), (2, -12.5, 28), (3, -5.5, 30), (4, -5, 26.2), (5, -11.5, 80), (6, -13.5, 77),
              (7, -10, 110)]
# the motor runs free: (start [s], rise and hold [s], whine gain added [dB], rush of the disc [dB])
FREE_SPINS = [(8.705, 0.092, -31.5, -40.5), (9.375, .1, -48, -54)]
# hiss of grit tearing steel: (frequency [Hz], relative density [dB per Hz])
ABRASION_SPECTRUM = [(300, -68), (500, -46), (800, -25), (1500, -10), (2150, 2.5), (3100, -1.5),
                     (4300, 0.5), (5400, -0.5), (7000, 6.5), (8500, 0.5), (10400, 2), (11500, -0.5),
                     (15700, -6.5)]
# high resonances of the sheet under the disc: (frequency [Hz], width [Hz], relative gain [dB])
SCREECH_MODES = [(7860, 160, -22), (10360, 410, -5.5), (11700, 650, -14), (12500, 260, -2),
                 (12920, 180, -1), (13700, 390, -2), (14800, 450, 2)]


def grinder():
    """Order tones and modulated abrasion: free whine sags under load; tearing pulses once a turn."""
    speed = curve(DISC_SPEED)
    turns = np.cumsum(speed) / SR
    # a fast disc skitters, which blurs and weakens its tones; it settles as the speed sags
    skitter = np.exp((speed - speed.max()) / 80)
    bite, ringing, knocking = pushes()
    drive, rush = amp(-45), 0  # the loaded whine stays beneath the free runs
    for s, length, whine_db, rush_db in FREE_SPINS:
        free = swell(s, length, attack=0.026, release=0.035)
        drive = drive + amp(whine_db) * free
        rush = rush + amp(rush_db) * free
    whine = drive * orders(turns, MOTOR_TONES, rate_hz=400, flicker_db=1.0)
    tones = orders(turns, DISC_TONES, rate_hz=250, flicker_db=3.0, loose=1 + 2.2 * skitter)
    knock = knocking * amp(-4 * skitter + 2.75 * wander(90)) * tones
    # the disc presses harder on one side of each turn and chatters in the slot
    chatter = amp(1.1 * wander(250) + 1.1 * wander(30))
    pressure = (1 + .5 * np.cos(2 * np.pi * turns)) * chatter
    tearing = grit(per_s=30000, spread_db=-1.5) * pressure
    abrasion = np.hypot(bite, rush) * colour(tearing, read(ABRASION_SPECTRUM, HZ) + 3.9 * ripple(90))
    screech = np.hypot(ringing, rush) * flaring(tearing, SCREECH_MODES, flare_db=4.5, rate_hz=20)
    return (whine + knock + abrasion + screech) * gate(8.7, 11, fade=0.0072)


def low_cut(x):
    """Steep high-pass filtering: the thin, quick sounds have no bass."""
    return signal.sosfilt(signal.butter(8, 440, "highpass", fs=SR, output="sos"), x)


def scene():
    """Superposition of the workshop at natural speed and the sped-up marking and cutting."""
    workshop = fan() + slides() + clinks() + blows()
    sped_up = fast_fan() + outdoors() + low_cut(strokes() + clicks() + grinder())
    return (workshop + low_cut(squeals()) + sped_up)[None]


def record(dry):
    """Soft saturation, strongest on the blows, then a linear-phase low-pass band limit."""
    limited = np.tanh(dry)
    band_limit = signal.firwin(511, 15850, window=("kaiser", 9), fs=SR)
    return signal.oaconvolve(limited, band_limit[None], "same")


dry = scene()
out = record(dry)
log_audio(out)
```